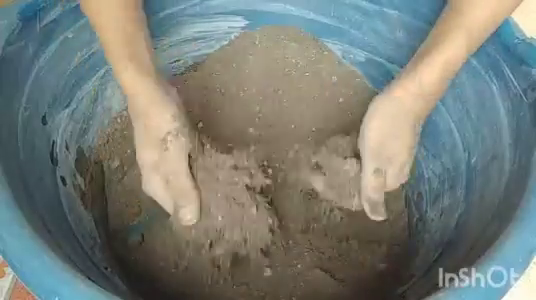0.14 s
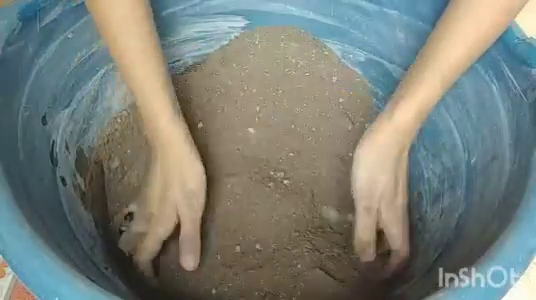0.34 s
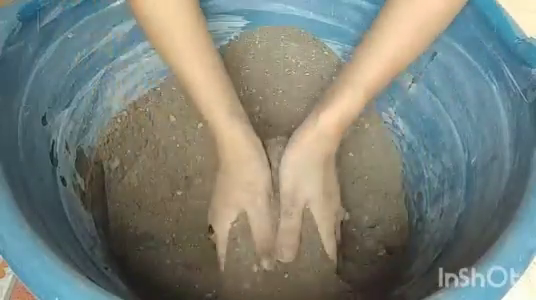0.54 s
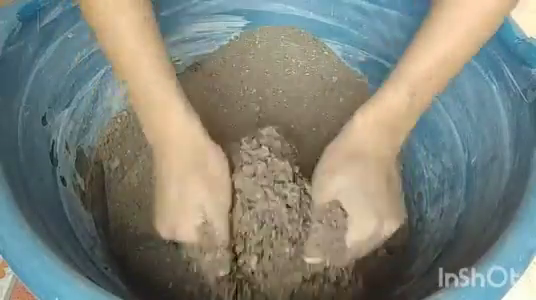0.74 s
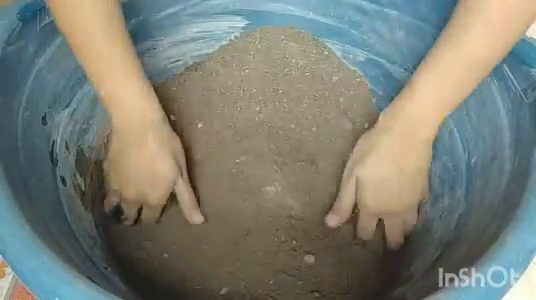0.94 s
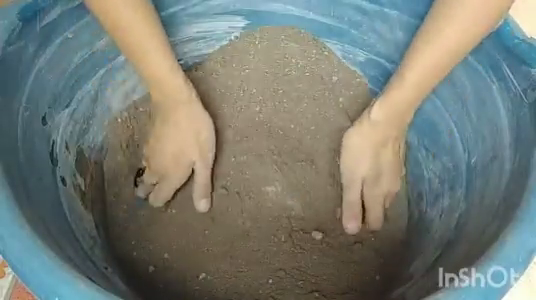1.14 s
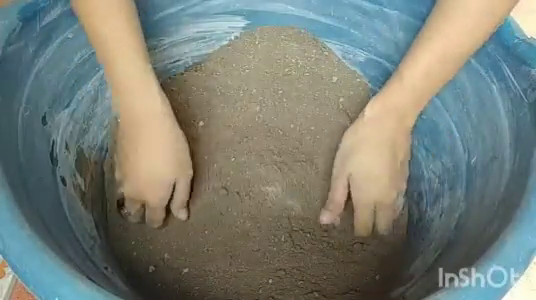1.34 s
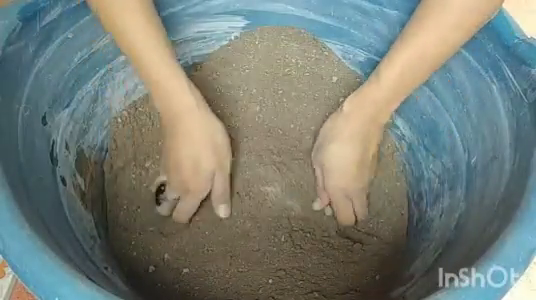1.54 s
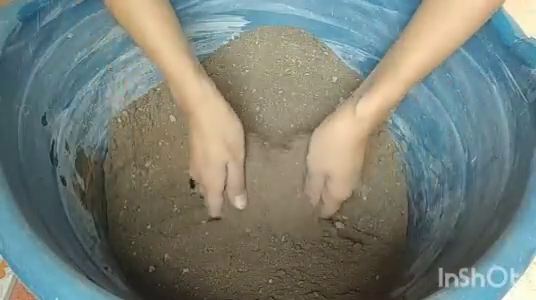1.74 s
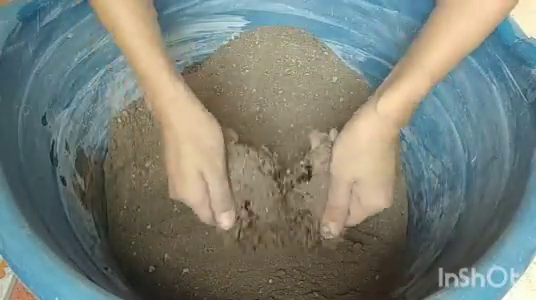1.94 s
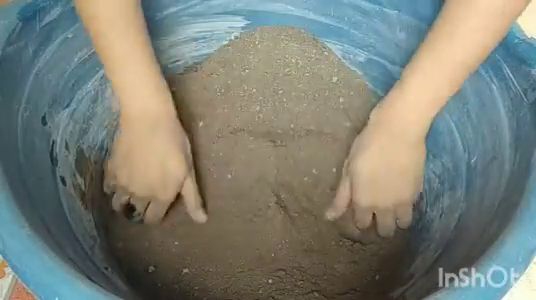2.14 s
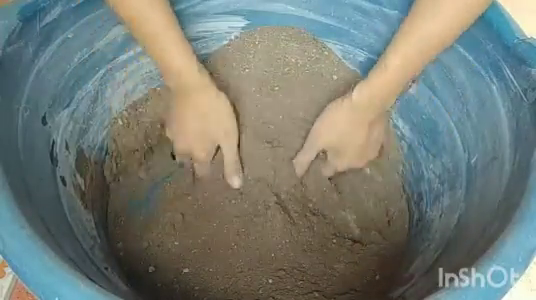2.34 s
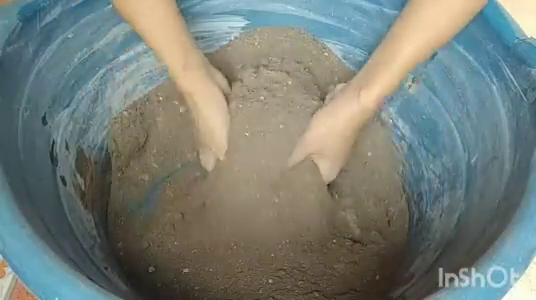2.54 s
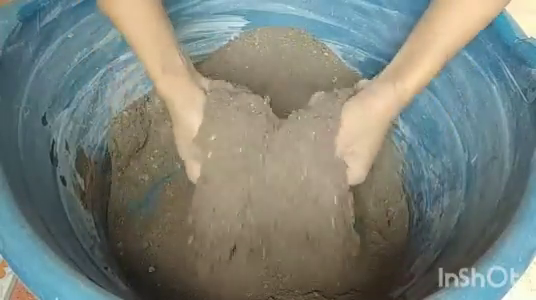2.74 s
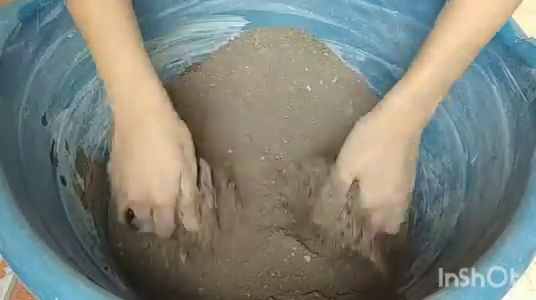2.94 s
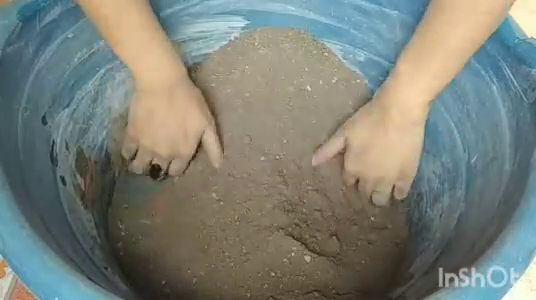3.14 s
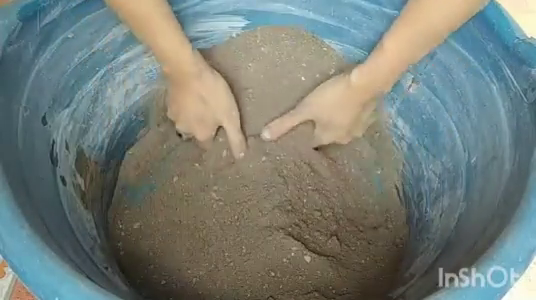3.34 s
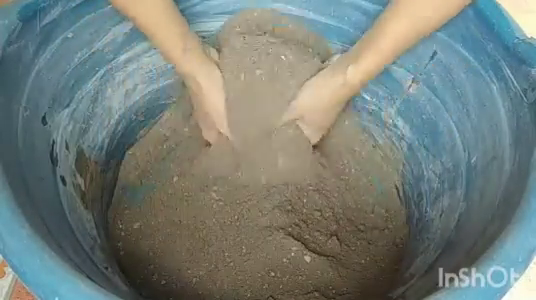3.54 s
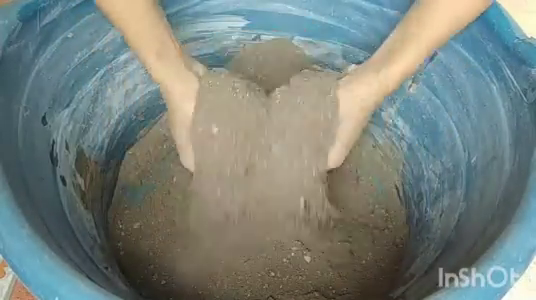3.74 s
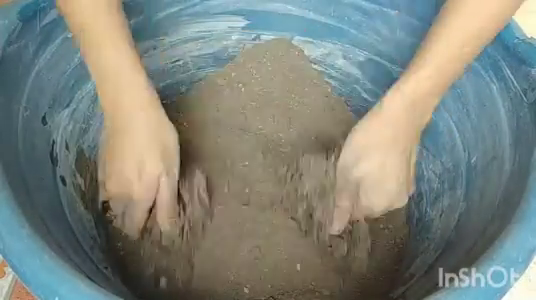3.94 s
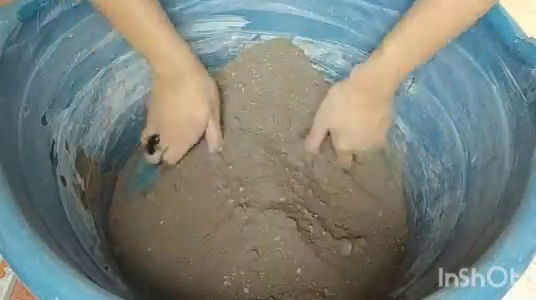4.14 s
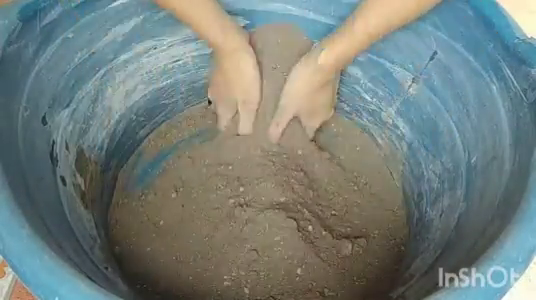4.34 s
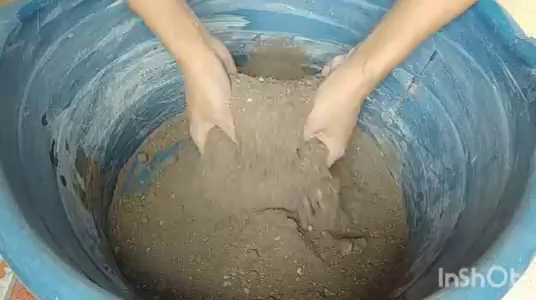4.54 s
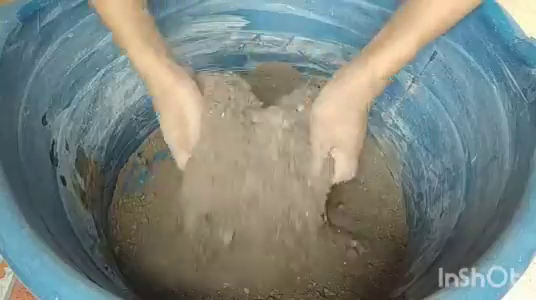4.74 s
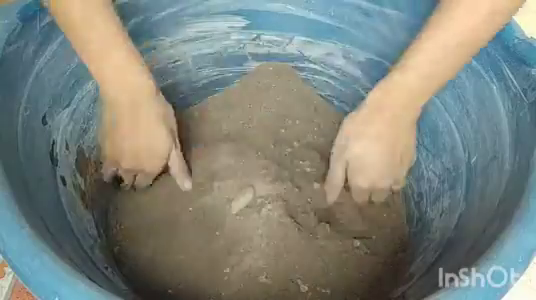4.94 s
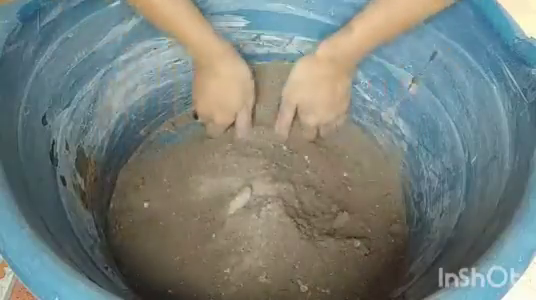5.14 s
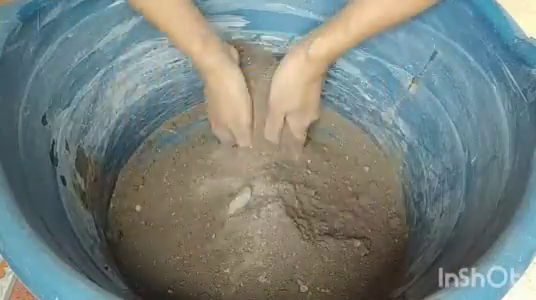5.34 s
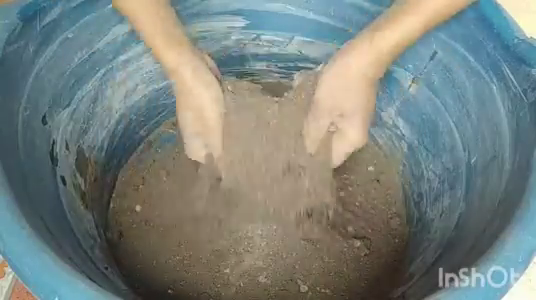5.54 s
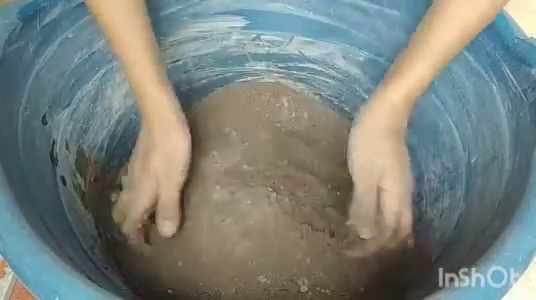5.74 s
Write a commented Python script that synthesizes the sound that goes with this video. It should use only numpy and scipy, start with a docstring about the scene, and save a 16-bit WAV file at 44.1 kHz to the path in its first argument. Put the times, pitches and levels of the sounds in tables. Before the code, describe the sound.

Handful after handful of moist, coarse sand crunches, spills and thuds softly in a hollow plastic tub, close up in a small humming room.

```python
"""A small room with a low hum: two hands scoop damp gritty sand in a plastic tub, squeeze it and let it
crumble back, handful after handful. Falling sand is three showers of random impacts: crumbs, grit and fine
grains, coloured by the tub. Clods thud as decaying tub modes with a puff of noise; small lumps snap as short
noise cracks. Hum is a wavering sine, louder once as the tub booms, over filtered-noise rumble and hiss."""
import sys
import numpy as np
from scipy import signal
from scipy.fft import rfft, irfft, next_fast_len
from scipy.io import wavfile
from scipy.ndimage import uniform_filter1d, map_coordinates

SR = 44100
rng = np.random.default_rng(int(sys.argv[2]) if len(sys.argv) > 2 else 0)


def file_out(sig):
    """Save sig as 16-bit WAV at sys.argv[1]."""
    # one column per channel
    cols = np.atleast_2d(sig).T
    # limit, then scale
    lim = np.clip(cols, -1, 1)
    pcm = np.round(lim * 32767).astype(np.int16)
    wavfile.write(sys.argv[1], SR, pcm)


N = 254898  # samples


def amp(db):
    """Decibels to gain."""
    return 10 ** (np.asarray(db) / 20)


def unit(x):
    """x at rms 1."""
    return x / np.sqrt(np.mean(x ** 2) + 1e-20)


def along(points, hz):
    """(f/Hz, value) points interpolated on a log frequency axis."""
    f, v = np.transpose(points)
    return np.interp(np.log(hz + 1), np.log(f + 1), v)


def wobble(rate_hz):
    """Smooth random curve, rate_hz knots a second."""
    knots = rng.standard_normal(int(N * rate_hz / SR) + 4)
    return map_coordinates(knots, [np.arange(N) * rate_hz / SR])


def filtered(x, response):
    """x times a response of frequency."""
    m = next_fast_len(len(x) + SR // 2)
    hz = np.fft.rfftfreq(m, 1 / SR)
    return irfft(rfft(x, m) * response(hz), m)[:len(x)]


def coloured(x, spectrum, size=4096):
    """x through a minimum-phase filter with the given (f/Hz, level/dB) spectrum."""
    gain = amp(along(spectrum, np.fft.rfftfreq(size, 1 / SR)))
    cepstrum = irfft(np.log(gain))
    cepstrum[1:size // 2] *= 2  # fold to causal
    cepstrum[size // 2 + 1:] = 0
    impulse = irfft(np.exp(rfft(cepstrum)))
    return signal.fftconvolve(x, impulse)[:len(x)]


def resonances(modes, hz):
    """Causal response of (f/Hz, width/Hz, level/dB) resonances over a flat base."""
    response = 1
    for centre, width, db in modes:
        bandpass = 1j * hz * width / (centre ** 2 - hz ** 2 + 1j * hz * width)
        response = response + (amp(db) - 1) * bandpass
    return response


def add(track, s, sound):
    """Mix a sound into the track at time s."""
    part = track[round(s * SR):][:len(sound)]
    part += sound[:len(part)]


# room rumble, relative spectrum: f/Hz, level/dB per Hz
RUMBLE_SPECTRUM = [(25, -33.5), (40, -31), (62, -5.5), (78, -3.5), (100, 0.5), (125, -2), (160, -12),
                   (230, -19), (340, -17.5), (500, -25), (740, -27.5), (1000, -37), (2000, -57)]
# room hiss, relative spectrum: f/Hz, level/dB per Hz
HISS_SPECTRUM = [(100, 5), (1000, 7), (3000, 2), (4400, 2.5), (5500, -3), (8000, -13), (16000, -17)]
HUM_HZ, HUM_DB = 102.8, -48.5
BOOM_AT_S, BOOM_WIDTH_S, BOOM_DB = 2.2, 0.36, 13


def background():
    """Low hum, wavering in level and phase, with the tub's boom swelling around 2.2 s; rumble, faint hiss."""
    t = np.arange(N) / SR
    boom_db = BOOM_DB * np.exp(-((t - BOOM_AT_S) / BOOM_WIDTH_S) ** 2)
    level_db = HUM_DB + boom_db + 2.5 * wobble(9)
    hum = amp(level_db) * np.sin(2 * np.pi * HUM_HZ * t + 0.6 * wobble(6.4))
    rumble = amp(-43.0) * unit(coloured(rng.standard_normal(N), RUMBLE_SPECTRUM, size=16384))
    hiss = amp(-63.0) * unit(coloured(rng.standard_normal(N), HISS_SPECTRUM))
    return hum + rumble + hiss


# room decay: f/Hz, t60/s
ROOM_DECAY = [(200, 0.95), (1000, 0.25), (4000, 0.078), (12000, 0.17)]


def room(x):
    """Reverberation: unit-energy noise tail 5 ms late, each band decaying at its own rate."""
    hz, t, z = signal.stft(rng.standard_normal(SR // 2), SR, nperseg=256)
    decay = amp(-60 * t / along(ROOM_DECAY, hz)[:, None])
    tail = signal.istft(z * decay, SR, nperseg=256)[1]
    delayed = np.pad(x, (SR // 200, 0))
    return signal.fftconvolve(delayed, tail / np.linalg.norm(tail))[:N]


# clods landing in the tub: t/s, level of the first 7 ms/dB, thud pitch f/Hz, room share/dB
CLOD_HITS = [(0.118, -24, 820, -8), (0.345, -39, 400, -16), (0.392, -26, 285, -11.5),
             (0.914, -27.5, 262, -1), (0.9244, -20.5, 295, -8), (0.9263, -12.5, 760, -10.5),
             (1.082, -18.5, 1460, -5.5), (1.515, -38, 310, -4), (2.136, -25, 292, -3),
             (2.164, -31.5, 297, -16.5), (3.07, -31, 293, -4.5), (3.181, -26.5, 310, -6.5),
             (4.033, -28.5, 754, -11), (4.043, -30.5, 274, 3), (4.086, -25.5, 299, -9),
             (4.108, -23.5, 800, 2.5), (4.146, -22.5, 750, -17)]
# modes of the sand-laden tub: f/Hz, relative level/dB, t60/s
TUB_MODES = [(255.3, 1, 0.05), (323.3, 5, 0.051), (664, -12, 0.035), (665, 0.5, 0.065), (857, 23.5, 0.0085),
             (1045, -6, 0.063), (1180, 5, 0.024), (1600, -6.5, 0.034)]


def clods():
    """Each clod rings the tub modes near its pitch, with a dull noise puff; returns direct sound, room send."""
    direct, sent, t = np.zeros(N), np.zeros(N), np.arange(SR // 4) / SR
    contact = 1 - np.exp(-t / 0.0008)
    for s, db, pitch_hz, room_db in CLOD_HITS:
        near = lambda hz: 1 / (1 + np.abs(np.log2((hz + 1) / pitch_hz) / 0.88) ** 4)
        ring = np.zeros(len(t))
        for hz, mode_db, t60 in TUB_MODES:
            # where the clod lands sets mode strength and phase
            decay = amp(mode_db + rng.normal(0, 1.5) - 60 * t / t60)
            ring += near(hz) * decay * np.sin(2 * np.pi * (hz * t + rng.random()))
        puff = filtered(rng.standard_normal(len(t)), near) * amp(-60 * t / 0.03)
        thud = (unit(ring) + 0.55 * unit(puff)) * contact
        thud = amp(db) * thud / np.std(thud[:SR // 150])
        add(direct, s, thud)
        add(sent, s, amp(room_db) * thud)
    return direct, sent


# lumps snapping and pebbles clicking: t/s, peak level/dB, crumbling t60/s
SNAP_HITS = [(0.3448, -34, .06), (0.7445, -28.5, 0.025), (0.8126, -11, .04), (0.853, -15.5, .033),
             (0.9241, -9, 0.074), (2.138, -31, .05), (2.9884, -27, 0.026), (3.006, -21, 0.018),
             (3.0522, -22.5, 0.072), (3.6, -31, 0.049), (3.9931, -19.5, .07), (4.041, -10.5, 0.031),
             (4.9014, -28, 0.03), (4.9506, -28, .036), (4.9864, -20, .033)]
# relative spectrum of one snap: f/Hz, level/dB per Hz
SNAP_SPECTRUM = [(150, -30), (700, -6.5), (2000, -10), (4000, -2), (5000, -7.5), (6000, -10.5), (7000, -21),
                 (9500, -35), (16000, -44)]


def snaps():
    """A lump gives way with one sharp crack, then sheds a short spray: noise with two decay rates."""
    track, t = np.zeros(N), np.arange(SR // 6) / SR
    for s, db, t60 in SNAP_HITS:
        decay = amp(-60 * t / 0.0045) + 0.56 * amp(-60 * t / t60)
        crack = coloured(rng.standard_normal(len(t)) * decay, SNAP_SPECTRUM)
        add(track, s, amp(db) * crack / np.max(np.abs(crack)))
    return track


ATTACK_DB_PER_S = 2502


def envelope(s, length_s, fall_db_per_s):
    """Level in dB of a move: steep rise to s, hold, steady fall."""
    t = np.arange(N) / SR - s
    return -ATTACK_DB_PER_S * np.maximum(-t, 0) - fall_db_per_s * np.maximum(t - length_s, 0)


# quiet sand movements, fingers digging and brushing, thin trickles after a handful:
# t/s, length/s, relative level/dB, brightness/dB
QUIET_MOVES = [(0.0, 0.16, -62, 4), (0.744, 0.066, -43, 5.5), (0.795, 0.039, -37.5, 5),
               (1.185, 0.052, -43, -2.5), (1.358, 0.03, -50, -3), (1.497, 0.012, -47, -2),
               (1.556, 0.0083, -50.5, 0), (1.927, 0.14, -62, 7), (2.989, 0.075, -42, 2),
               (3.536, .11, -47, 0.5), (3.975, 0.065, -43, 6), (4.505, 0.064, -51.5, 0.5),
               (4.902, 0.065, -46, 2.5), (4.947, .04, -38.5, 6), (5.349, .14, -45.5, 2),
               (5.6, 0.053, -60, 3)]
QUIET_GRIT_DB, QUIET_FALL_DB_PER_S = -1, 166


def quiet_movements():
    """Digging, brushing or trickling holds a steady level, then settles; yields fine, grit, crumbs in dB."""
    for s, length_s, db, bright_db in QUIET_MOVES:
        level = db + envelope(s, length_s, QUIET_FALL_DB_PER_S)
        yield level + bright_db, level + QUIET_GRIT_DB, level - bright_db


# packed clumps bursting as they land: t/s, relative level/dB, brightness/dB
CLUMP_BURSTS = [(0.116, -41, -2), (0.39, -30.5, -8), (0.471, -37.5, 6), (0.926, -20, -2), (0.988, -20, 3),
                (1.997, -59, 12), (2.146, -29.5, 6), (2.269, -14.5, -9.5), (3.081, -25.5, 2.5),
                (3.174, -15, -6), (3.6, -43, 0), (4.249, -16, -6.5), (5.03, -21.5, 3), (5.111, -17, -4.5),
                (5.763, -28, 4.5)]
BURST_HOLD_S, BURST_FALL_DB_PER_S, BURST_CRUMBS_DB = 0.0056, 340, -11


def bursts():
    """A clump falls apart at once; a bright one gives more fine grains and fewer crumbs."""
    for s, db, bright_db in CLUMP_BURSTS:
        level = db + envelope(s, BURST_HOLD_S, BURST_FALL_DB_PER_S)
        yield level + bright_db, level, level - bright_db + BURST_CRUMBS_DB


# handfuls falling back on the heap: t/s, swell/s, hold/s, relative level/dB, grit fall/(dB/s),
# fine over grit/dB, crumbs over grit/dB
HANDFULS = [(0.336, 0.092, 0.035, -31.5, 316.5, -3.5, -8.5), (0.906, 0.053, .16, -22, 213, -2, -6),
            (2.137, 0.16, 0.074, -21, 239, -4.5, -6), (3.061, 0.15, 0.18, -18.5, 178.5, -3, -8.5),
            (4.047, 0.15, 0.11, -15.5, 218.5, -4, -6.5), (4.981, 0.16, 0.088, -18, 226.5, -3.5, -7)]
FINE_SWELL_DB, GRIT_SWELL_DB, CRUMB_SWELL_DB = 8, 14, 6
FINE_FALL_SHARE, CRUMB_FALL_SHARE = 0.84, 0.81  # of the grit fall rate
SAG_DB_PER_S = 30


def pours():
    """A handful swells as fingers open, sags as they empty, trails off; grit swells most, stops sharpest."""
    t = np.arange(N) / SR
    sizes = [(FINE_SWELL_DB, FINE_FALL_SHARE), (GRIT_SWELL_DB, 1), (CRUMB_SWELL_DB, CRUMB_FALL_SHARE)]
    for s, swell, hold, db, fall, fine_db, crumbs_db in HANDFULS:
        closed = np.clip(1 - (t - s) / swell, 0, 1)
        level = db - SAG_DB_PER_S * np.clip(t - s - swell, 0, hold)
        fine, grit, crumbs = [level - depth_db * closed + envelope(s, swell + hold, share * fall)
                              for depth_db, share in sizes]
        yield fine + fine_db, grit, crumbs + crumbs_db


def flow():
    """Strength of fine grains, grit and crumbs: the powers of all moves add up."""
    power = 0
    for moves in (pours(), bursts(), quiet_movements()):
        for levels_db in moves:
            power = power + amp(np.maximum(levels_db, -120)) ** 2
    return np.sqrt(power)


def impacts(rate, spread_db):
    """Random grain impacts of clipped log-normal size, rate a second, at even mean power and rms 1."""
    chance = np.clip(rate / SR, 1e-4, 1)
    hits = (rng.random(N) < chance) * rng.choice([-1, 1], N)
    size_db = spread_db * np.clip(rng.standard_normal(N), -2, 2)
    return unit(hits * amp(size_db) / np.sqrt(chance))


def patchy(x, depth_db):
    """Colour flickers in random gain patches, roughly 200 Hz by 20 ms."""
    z = signal.stft(x, nperseg=512)[2]
    field = uniform_filter1d(rng.standard_normal(z.shape), size=2, axis=0)
    field = uniform_filter1d(field, size=3, axis=1)
    return signal.istft(z * amp(depth_db * unit(field)), nperseg=512)[1][:N]


# relative spectrum of falling grains: f/Hz, level/dB per Hz
SAND_SPECTRUM = [(90, -34.5), (200, -16), (325, -4), (460, -10.5), (690, 4), (900, -1.5), (1700, -2),
                 (2250, 4), (3500, -0.5), (4900, -6), (5800, -14), (6900, -22.5), (9500, -36.5),
                 (13000, -37.5), (16000, -41)]
# tub hollow, heard in every falling grain: f/Hz, width/Hz, level/dB
HOLLOW_MODES = [(680, 170, -4), (1080, 73, 2), (1280, 140, 3), (1520, 46, 5), (1590, 22, -1.5),
                (2250, 96, -2.5), (2440, 120, -2), (3000, 65, -4.5), (6820, 480, 6.5)]


def shower(rate, low_hz, high_hz):
    """Impacts of one grain size, band-limited and coloured by the tub hollow, at rms 1."""
    hits = patchy(impacts(rate, spread_db=4.5), depth_db=2.6)
    band = lambda hz: 1 / np.sqrt((1 + (low_hz / (hz + 1)) ** 14) * (1 + (hz / high_hz) ** 14))
    response = lambda hz: band(hz) * resonances(HOLLOW_MODES, hz)
    return unit(filtered(coloured(hits, SAND_SPECTRUM), response))


def falling_sand():
    """More flow means more impacts a second; the sand's weight shakes the tub as a low noise boom."""
    fine, grit, crumbs = flow()
    rate = 1700 + 8500 * np.sqrt((fine + grit) / np.max(fine + grit))
    # crumbs: few and low; finest grains: many and high
    low = amp(-3.5) * crumbs * shower(rate / 6, low_hz=120, high_hz=1365)
    middle = amp(-2.5) * grit * shower(rate / 2, low_hz=1287, high_hz=3470)
    high = amp(-4.5) * fine * shower(rate, low_hz=3670, high_hz=16000)
    clumping = amp(0.7 * wobble(70))  # slight level waver
    boom_spectrum = [(25, -53.5), (60, 0.0), (125, 0.5), (200, -13.5), (400, -58)]  # f/Hz, level/dB
    boom = unit(coloured(rng.standard_normal(N), boom_spectrum))
    weight = np.sqrt(np.abs(uniform_filter1d(grit + crumbs, size=4000)))
    return clumping * (low + middle + high) + amp(-32) * weight * boom


def scene():
    """Sand close by, a little room, and the background."""
    sand = falling_sand() + snaps()
    thuds, thuds_sent = clods()
    reverb = room(amp(-10.0) * sand + thuds_sent)
    return (sand + thuds + reverb + background())[None]


# microphone presence peak: f/Hz, width/Hz, level/dB
PRESENCE_PEAK = [(4334, 440, 6.9)]
TOP_HZ = 15850


def record(dry):
    """Small microphone: presence peak, soft limiting of the loudest peaks, steep band limit."""
    voltage = filtered(dry[0], lambda hz: resonances(PRESENCE_PEAK, hz))
    rounded = voltage / (1 + np.abs(voltage / 0.95) ** 6) ** (1 / 6)
    return filtered(rounded, lambda hz: hz < TOP_HZ)[None]


dry = scene()
out = record(dry)
file_out(out)
```